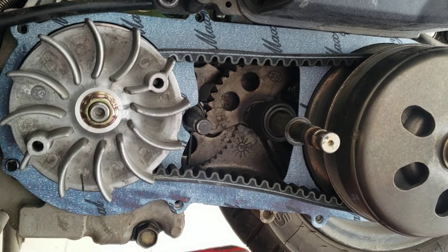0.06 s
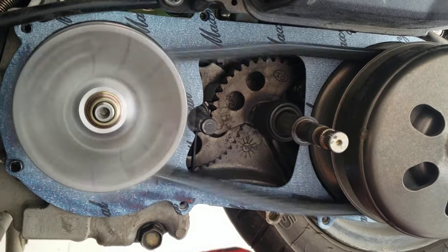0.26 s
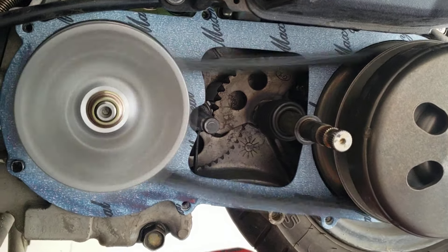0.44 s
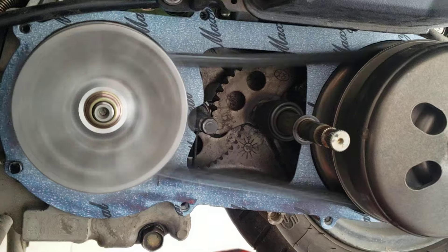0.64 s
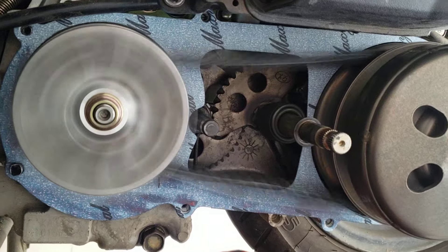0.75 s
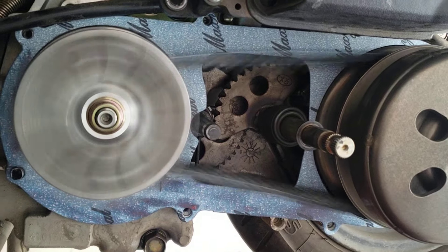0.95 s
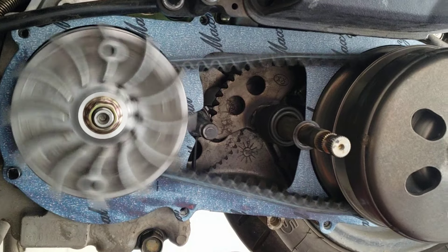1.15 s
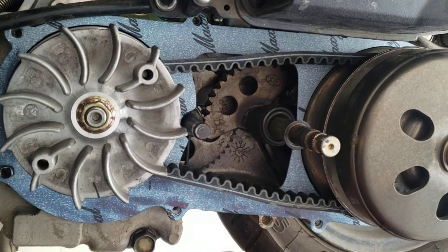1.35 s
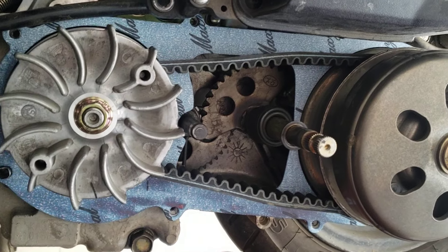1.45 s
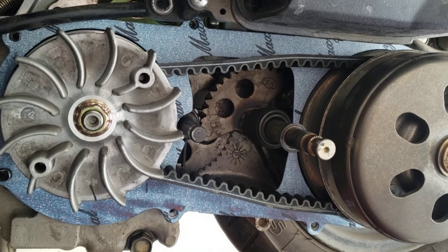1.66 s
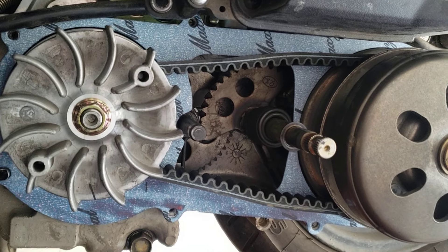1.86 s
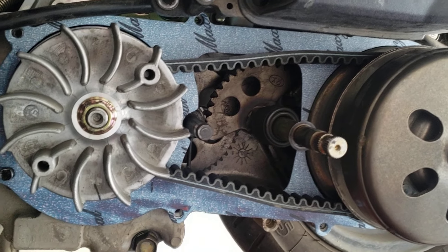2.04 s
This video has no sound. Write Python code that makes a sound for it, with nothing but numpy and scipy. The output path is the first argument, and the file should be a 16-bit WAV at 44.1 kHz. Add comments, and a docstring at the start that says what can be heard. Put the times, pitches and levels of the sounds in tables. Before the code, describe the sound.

A scooter belt drive cranked once: a clack, rising gear squeal, then whirring down with knocks.

```python
"""A scooter's open belt drive is cranked once in a workshop, while a far engine idles throughout.
At 0.2 s the starter gear clacks in and rings the case; its meshing teeth squeal up to speed in steps.
Near 0.47 s it drops out and the slack belt thumps. The fan pulley and belt coast down, whirring and
flapping, and the gear grabs twice more, at 0.7 and 0.9 s. Two last knocks near 1.2 s end the run,
and the drive rings on faintly."""
import sys
import numpy as np
from scipy import signal
from scipy.fft import rfft, irfft, next_fast_len
from scipy.io import wavfile
from scipy.ndimage import map_coordinates

SR = 44100
rng = np.random.default_rng(int(sys.argv[2]) if len(sys.argv) > 2 else 0)


def waveform_to_disk(signal):
    """Save audio, clipped to [-1, 1], as 16-bit WAV at the path in sys.argv[1]."""
    frames = np.transpose(np.atleast_2d(signal))
    scaled = np.clip(frames, -1, 1) * 32767
    samples = np.round(scaled).astype(np.int16)
    wavfile.write(sys.argv[1], SR, samples)


N = 92610


def amp(db):
    """Amplitude ratio of a level in decibels."""
    return 10 ** (np.asarray(db) / 20)


def unit(x):
    """Normalisation to rms 1."""
    return x / np.sqrt(np.mean(x ** 2) + 1e-20)


def along(points, hz):
    """Interpolation of (frequency, value) points on a logarithmic axis."""
    f, v = np.transpose(points)
    return np.interp(np.log(hz + 1), np.log(f + 1), v)


def clock():
    """Time of each sample in seconds."""
    return np.arange(N) / SR


def curves(rows):
    """Linear interpolation in time of each column after the first."""
    times, *columns = np.transpose(rows)
    return [np.interp(clock(), times, column) for column in columns]


def wobble(rate, size=N):
    """Smooth random modulation: a spline through rate knots a second."""
    return map_coordinates(rng.standard_normal(8192), [np.arange(size) / SR * rate], mode="mirror")


def filtered(x, response):
    """Linear filtering: the spectrum is multiplied by a frequency response."""
    m = next_fast_len(N + SR // 2)
    return irfft(rfft(x, m) * response(np.fft.rfftfreq(m, 1 / SR)), m)[..., :N]


# likeness of left and right (frequency [Hz], correlation [1])
COHERENCE = [(60, 0.86), (150, 1), (350, .8), (700, .7), (1400, 0.15), (3000, -0.006), (10000, -0.13),
             (15000, 0.46)]
def stereo_angle(hz):
    """Coherence as an angle: the channels correlate as the cosine of twice this."""
    return np.arccos(np.clip(along(COHERENCE, hz), -1, 1)) / 2


def spread(pair):
    """Mid-side mixing makes two independent signals partly coherent, most of all in the bass."""
    mid, side = filtered(pair, lambda hz: np.array([np.cos(stereo_angle(hz)), np.sin(stereo_angle(hz))]))
    return np.array([mid + side, mid - side])


# resonances of the case (frequency [Hz], bandwidth [Hz], relative level [dB])
CASE_MODES = [(1314, 70, -4), (1676, 19, 3.5), (1835, 67, 0.5), (2460, 24, -2), (2857.6, 130, 1.5),
              (3735, 50, -0.5), (3970, 36, 3), (4570, 32, -7.5), (4990, 150, -8), (5200, 81, -7)]
def case_response(f):
    """Resonance: the modes add in power, with a gain of about 1 at the strongest."""
    top_db = max(db for _, _, db in CASE_MODES)
    return np.sqrt(sum(amp(db - top_db) ** 2 / (1 + (2 * (f - hz) / width) ** 2) ** 2
                       for hz, width, db in CASE_MODES))


def shaped_noise(colour, grain_db=0, ring=0):
    """Random excitation, rms 1: grain_db makes it uneven contacts, ring adds the case's resonances."""
    contacts = rng.standard_normal((2, N)) * amp(grain_db * np.tanh(wobble(900)))
    plain = unit(filtered(contacts, lambda hz: amp(along(colour, hz))))
    ringing = unit(filtered(contacts, case_response))
    return unit(spread(plain + ring * ringing))


# preset gain curves for the broadband and midrange parts of the workshop noise (time [s], level [dB])
AIR_LEVEL = [(0, -44.5), (1.3, -50), (2.1, -54.5)]
MIDRANGE_LEVEL = [(0, -51.5), (.2, -53), (1.3, -75.5), (1.65, -62.5), (1.8, -63), (2.1, -62)]
# spectra of the two parts (frequency [Hz], relative level [dB])
AIR_SPECTRUM = [(20, -12.5), (45, -2), (100, 3), (200, 2), (300, -11), (500, -10.5), (800, -18.5),
                (1300, -29), (2000, -22.5), (5000, -28.5), (7500, -31), (8500, -39.5), (12500, -38),
                (15000, -47)]
MIDRANGE_SPECTRUM = [(120, -22.5), (280, 0.5), (500, -11), (750, -2), (1050, -9.5), (1290, -2.5),
                     (1600, -13), (3000, -29.5)]
def workshop_air():
    """Steady noise: its midrange ducks under the cranking and partly returns, as with gain control."""
    (air_db,), (midrange_db,) = curves(AIR_LEVEL), curves(MIDRANGE_LEVEL)
    return amp(air_db) * shaped_noise(AIR_SPECTRUM) + amp(midrange_db) * shaped_noise(MIDRANGE_SPECTRUM)


# idle speed (time [s], fundamental [Hz])
IDLE_RATE = [(0, 29.03), (1.1, 29.01), (1.4, 30.04), (1.7, 29.64), (1.85, 30.58), (2.1, 31.63)]
# engine harmonics (time [s], level of each of orders 2 to 6 [dB])
ENGINE_ORDERS = [(0, -43.5, -47.5, -59.5, -48, -83), (.9, -49, -50, -75, -58, -47.5),
                 (1.3, -58, -46, -49.5, -47, -71.5), (1.65, -51, -70, -50.5, -48.5, -48.5),
                 (1.82, -53.5, -71, -42.5, -57.5, -66), (2.1, -53.5, -54, -54.5, -67.5, -52.5)]
def far_engine():
    """Periodic firing gives a harmonic series; phase dispersion smears each pulse."""
    dispersion = .35  # radians per order squared
    (rate_hz,) = curves(IDLE_RATE)
    phase = 2 * np.pi * np.cumsum(rate_hz) / SR
    hum = np.zeros(N)
    for k, db in enumerate(curves(ENGINE_ORDERS), 2):
        peak = np.sqrt(2) * amp(db + 0.81 * wobble(12))
        hum += peak * np.sin(k * phase + dispersion * k * k + 0.068 * wobble(14))
    return hum


# the workshop's decay (frequency [Hz], reverberation time T60 [s])
ROOM_T60 = [(100, 0.17), (1000, 1), (4000, 0.65), (8000, 0.63), (15000, 0.2)]
def reverberation(x):
    """Convolution with a diffuse, exponentially decaying tail that lasts longest in the midrange."""
    hz, t, spectra = signal.stft(rng.standard_normal((2, SR)), SR, nperseg=256)
    tail = signal.istft(spectra * amp(-60 * t / along(ROOM_T60, hz)[:, None]), SR, nperseg=256)[1]
    tail = np.pad(tail / np.linalg.norm(tail[0]), ((0, 0), (SR // 200, 0)))  # arrives 5 ms late
    return signal.fftconvolve(x, tail, axes=1)[:, :N]


# faint modes of the drive (frequency [Hz], level [dB], T60 [s])
DRIVE_MODES = [(757, -47, 0.59), (1010, -45.5, 0.72), (1254, -47.5, .55), (2850, -56, .45)]
def after_ring(start_s=1.21, rise_s=0.0036):
    """Free decay after the last knock: narrow bands of noise beat as they fade."""
    t = np.maximum(clock() - start_s, 0)
    ring = np.zeros(N)
    for hz, db, t60 in DRIVE_MODES:
        phase = 2 * np.pi * hz * t
        ring += amp(db - 60 * t / t60) * (wobble(45.6) * np.sin(phase) + wobble(44.9) * np.cos(phase))
    return ring * (1 - np.exp(-t / rise_s))


# flapping of the belt (time [s], level [dB])
FLAP_LEVEL = [(.15, -78), (.22, -38.5), (.48, -42), (.51, -31.5), (.6, -37), (.68, -34), (.8, -42),
              (.92, -37.5), (1.02, -53.5), (1.11, -43), (1.3, -47), (1.5, -77)]
# its spectrum (frequency [Hz], relative level [dB])
FLAP_SPECTRUM = [(20, -29.5), (50, -4.5), (78, 5.5), (105, -6.5), (135, 12), (180, -3), (300, -8),
                 (600, -26)]
def belt_flap():
    """Irregular transverse vibration of the slack belt radiates low noise."""
    (flap_db,) = curves(FLAP_LEVEL)
    return amp(flap_db) * shaped_noise(FLAP_SPECTRUM)


# the belt jerks taut, then goes slack (time [s], frequency [Hz], level [dB])
BELT_SLAPS = [(.19, 150, -32.5), (.5, 134.4, -24.5)]
def belt_slaps(rise_s=.008, decay_s=0.028):
    """A step in tension sets the belt's free span into damped oscillation."""
    out = np.zeros(N)
    for s, hz, db in BELT_SLAPS:
        t = np.maximum(clock() - s, 0)
        out += amp(db) * (1 - np.exp(-t / rise_s)) * np.exp(-t / decay_s) * np.sin(2 * np.pi * hz * t)
    return out


# the coasting drive (time [s], whirr level [dB], fizz level [dB])
COAST_LEVELS = [(.19, -110, -120), (.3, -49, -66), (.48, -26, -30.5), (.55, -32.5, -37.5), (.63, -34, -46),
                (.75, -29, -35.5), (.85, -32.5, -38.5), (.95, -31.5, -44), (1.03, -37.5, -51),
                (1.09, -36, -53), (1.15, -48.5, -75.5), (1.24, -41.5, -62.5), (1.36, -52, -71),
                (1.5, -65.5, -88.5), (1.7, -110, -120)]
# spectra of the whirr and of the treble fizz of all contacts (frequency [Hz], relative level [dB])
WHIRR_SPECTRUM = [(88, -38), (150, -19), (259, -11.5), (485, -9.5), (852, -9.5), (1810, -8.5),
                  (2460, -10.5), (2890, -5.5), (3290, -7), (3860, -10), (5070, -6), (6250, -19.5),
                  (7000, -18), (9100, -47.5), (15400, -120)]
FIZZ_SPECTRUM = [(4500, -36), (6600, -8), (7400, -4), (8400, -15), (9600, -4), (11400, -4), (13000, -7.5),
                 (15500, -16)]
def coasting():
    """Rolling-contact noise: a nearly even, slightly grainy whirr and fizz of the belt and bearings."""
    whirr_db, fizz_db = curves(COAST_LEVELS)
    waver = amp(0.4 * wobble(84))
    whirr = amp(whirr_db) * shaped_noise(WHIRR_SPECTRUM, grain_db=1.5, ring=0.3)
    fizz = amp(fizz_db) * shaped_noise(FIZZ_SPECTRUM, grain_db=3.0)
    return waver * (whirr + fizz)


# metal knocks (time [s], level [dB], rise [s], decay [s], edge level before a 7.5 dB cut [dB],
# thud level [dB], thud frequency [Hz]); edge and thud are relative to the body
KNOCKS = [(0.193, -26, 0.0018, 0.017, 2, -15, 900), (0.2055, -13.5, 0.00052, 0.0018, -8, -5, 716),
          (0.2076, -18, 0.00033, 0.0051, -8, -4, 1500), (.655, -27, 0.007183, .016, -1, -14.5, 960),
          (0.711, -17.5, 0.00397, 0.021, 3, -9, 1080), (.768, -29, .003, .008, -14.5, -11, 1310),
          (0.8912, -19.5, 0.003296, 0.016, -6.5, -4, 1040), (1.1622, -22, 0.0014, 0.0084, -5.5, -11.5, 850),
          (1.175, -31.5, 0.0069, 0.031, -4.5, -2.5, 805), (1.206, -28.5, 0.002, .016, -5.5, -1, 1280)]
# body of a knock (frequency [Hz], relative level [dB])
KNOCK_SPECTRUM = [(180, -46), (300, -7), (412, -18), (1230, -1), (2540, -2), (2860, -11), (3170, 4.5),
                  (3820, -6.5), (4190, -3), (5100, -1.5), (7000, -17.5), (9100, -58.5), (15400, -120)]
def knocks(thud_half_width_octaves=0.2845):
    """Impact noise: a quick cluster of metal contacts with a bright edge and a resonant thud."""
    body = shaped_noise(KNOCK_SPECTRUM, grain_db=2, ring=0.49)
    edge = shaped_noise(FIZZ_SPECTRUM, grain_db=2.5)
    force = spread(rng.standard_normal((2, N)))
    out = np.zeros((2, N))
    for s, db, rise, decay, edge_db, thud_db, thud_hz in KNOCKS:
        t = clock() - s
        envelope = np.clip(t / rise, 0, 1) * np.exp(-np.maximum(t - rise, 0) / decay)
        band = lambda hz: 1 / (1 + (np.log2((hz + 1) / thud_hz) / thud_half_width_octaves) ** 4)
        thud = unit(filtered(force, band))
        out += amp(db) * envelope * (body + amp(edge_db - 7.5) * edge + amp(thud_db) * thud)
    return out


# hollow ring of the case (frequency [Hz], level [dB], T60 [s])
CLUNK_MODES = [(655.49, -16.5, 0.051), (814, -12.5, 0.038), (1287, -25.5, .08), (1900, -22, .025)]
def clunk(start_s=.2053, rise_s=0.0011):
    """Impulse response: the gear slams into mesh and the case's modes decay exponentially."""
    t = np.maximum(clock() - start_s, 0)
    ring = sum(amp(db - 60 * t / t60) * np.sin(2 * np.pi * hz * t) for hz, db, t60 in CLUNK_MODES)
    return (1 - np.exp(-t / rise_s)) * ring


# the gear spinning up (time [s], rattle level before a 3 dB lift [dB], fizz level [dB])
RATTLE_LEVELS = [(.19, -120, -120), (.212, -33, -43), (.245, -26, -34), (.29, -24.5, -27), (.34, -24, -26),
                 (.4, -24, -24), (.432, -29.5, -31), (.462, -19.5, -19), (.48, -34, -30),
                 (.52, -48.5, -52.5), (.6, -120, -120)]
# the rattle's spectrum (frequency [Hz], relative level [dB])
RATTLE_SPECTRUM = [(150, -51.5), (250, -29), (349, -25), (818, -7), (953, -13), (1310, -4), (1450, -14.5),
                   (1860, -14.5), (2110, -12.5), (2790, -5.5), (3840, -6), (4180, -7.5), (4740, -0.5),
                   (6170, -17.5), (7000, -33), (9100, -47.5), (15400, -120)]
def gear_rattle():
    """Forced vibration: dense, uneven contacts of the starter gear shake the case."""
    rattle_db, fizz_db = curves(RATTLE_LEVELS)
    chatter = amp(2.2 * np.tanh(wobble(130)))
    rattle = amp(rattle_db + 3.0) * shaped_noise(RATTLE_SPECTRUM, grain_db=4.5, ring=.5)
    fizz = amp(fizz_db) * shaped_noise(FIZZ_SPECTRUM, grain_db=4.5)
    return chatter * (rattle + fizz)


# how the case radiates the tooth tones (frequency [Hz], gain [dB])
RADIATION = [(600, -20.5), (950, -5), (1200, 2), (1450, -2.5), (1700, -4), (1880, -2.5), (2300, -4.5),
             (2850, 0.5), (3750, 0.5), (4650, -0.5), (5600, -3), (6300, -22), (7400, -9.5), (9000, -17),
             (11300, -10), (16000, -26.5)]
def mesh_tone(rate_hz, formant_hz, jitter=.013, formant_db=7, formant_octaves=.3, gain_db=-2):
    """Gear meshing gives harmonics of the tooth rate, randomly modulated and lifted round a formant."""
    n = len(rate_hz)
    phase = 2 * np.pi * np.cumsum(rate_hz * (1 + jitter * wobble(700, size=n))) / SR
    out = np.zeros((2, n))
    for k in range(1, 9):
        hz = k * rate_hz
        apart = stereo_angle(hz) * (-1) ** k
        rough_db = 3.5 * np.tanh(wobble(400, size=n))
        flicker_db = 1.5 * np.tanh(wobble(76, size=n))
        lift_db = formant_db * np.exp(-(np.log2(hz / formant_hz) / formant_octaves) ** 2)
        level_db = along(RADIATION, hz) + lift_db + rough_db + flicker_db + gain_db
        out += amp(level_db) * np.sin(k * phase + np.array([apart, -apart]))
    return out


# bites of the gear (time [s], tooth rate [Hz], relative glide [1/s], relative level [dB],
# Gaussian half width [s], formant [Hz])
BITES = [(.226, 655, 1, -27.5, 0.0076, 1300), (.241, 942, 5, -23, 0.0058, 3200),
         (.257, 1160, -1, -19.5, 0.004, 4100), (.281, 1395, 2, -23, 0.005106, 2750),
         (.297, 1519, 1, -21.5, 0.0066, 3211), (.314, 1616, 1, -21, 0.0057, 4850),
         (.335, 1708, 0.5, -19, 0.0059, 3400), (.355, 1793, 1, -23.5, .006, 3570),
         (.379, 1882, .5, -22.5, .006, 3977), (.398, 1877, -.5, -20, 0.0066, 3750),
         (.415, 1900, 1.06, -23, 0.0079, 3820), (.444, 1985, 0.9434, -22, .007, 3960),
         (.4605, 1857, -8.5, -13.5, .004, 3720), (.466, 1270, -7, -24.5, 0.0036, 1270),
         (.4675, 1734, -5, -20, 0.0041, 5200), (.7135, 985, -7, -23, 0.002505, 2950),
         (0.7194, 1864, -12, -17.5, .0035, 3690), (.897, 938.3, -6.5, -27.5, 0.0033, 3750),
         (.903, 962, -2, -24.5, 0.004812, 2890)]
def gear_squeals():
    """Pitch follows tooth rate: short glides step up with speed and fall as the gear drops out."""
    out = np.zeros((2, N))
    t = (np.arange(SR // 10) - SR // 20) / SR
    for s, hz, glide, db, width, formant_hz in BITES:
        start = round((s + t[0]) * SR)
        envelope = amp(db) * np.exp(-(t / width) ** 2 / 2)
        out[:, start:start + len(t)] += envelope * mesh_tone(hz * np.exp(glide * t), formant_hz)
    return out


def scene(reverb_db=-14):
    """Superposition of the drive's direct sound, its reverberation and the background."""
    drive = clunk() + gear_rattle() + gear_squeals() + knocks()
    drive += belt_slaps() + coasting() + belt_flap() + after_ring()
    return drive + amp(reverb_db) * spread(reverberation(drive)) + far_engine() + workshop_air()


# stereo balance (frequency [Hz], left minus right level [dB])
BALANCE = [(60, 2.5), (300, 3), (700, 1.5), (1290, 0), (2400, 6), (4400, 2), (8000, 6), (11000, -3.5),
           (15000, 0)]
def record(dry, ceiling=.9, top_hz=15800):
    """Transduction: the microphones mostly favour the left, saturate softly and limit the bandwidth."""
    leaning = filtered(dry, lambda hz: amp(along(BALANCE, hz) * np.array([[.5], [-.5]])))
    rounded = leaning / (1 + np.abs(leaning / ceiling) ** 10) ** (1 / 10)
    return filtered(rounded, lambda hz: hz < top_hz)


dry = scene()
out = record(dry)
waveform_to_disk(out)
```